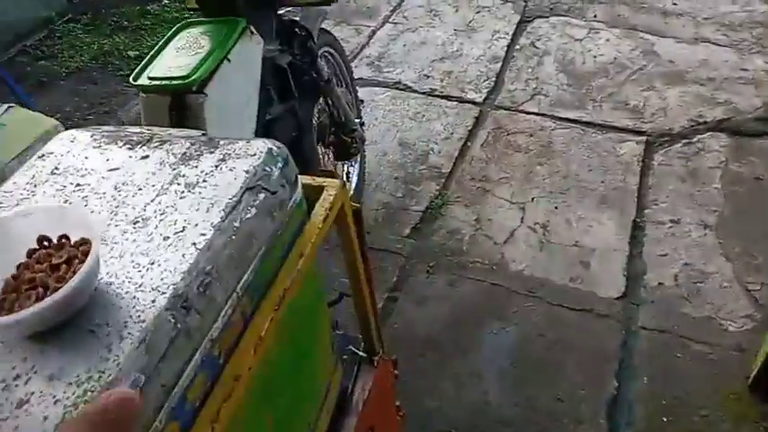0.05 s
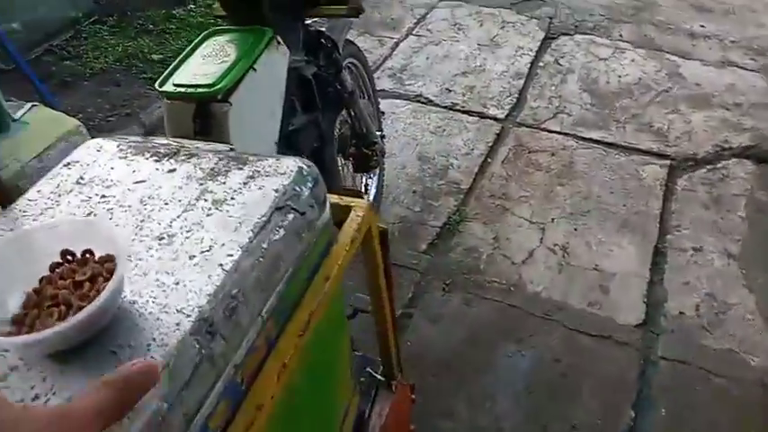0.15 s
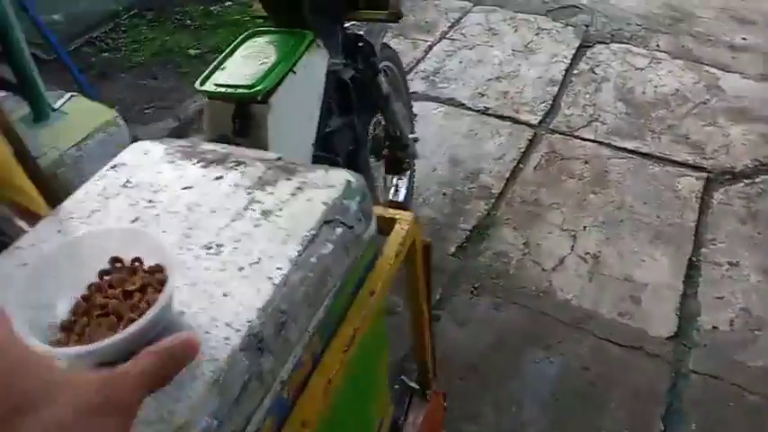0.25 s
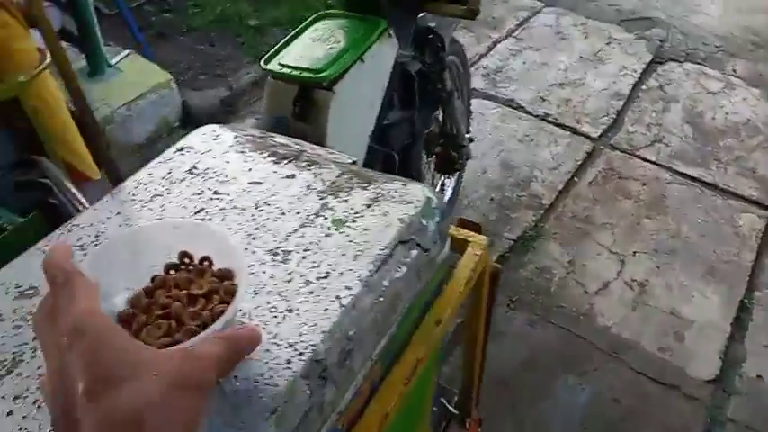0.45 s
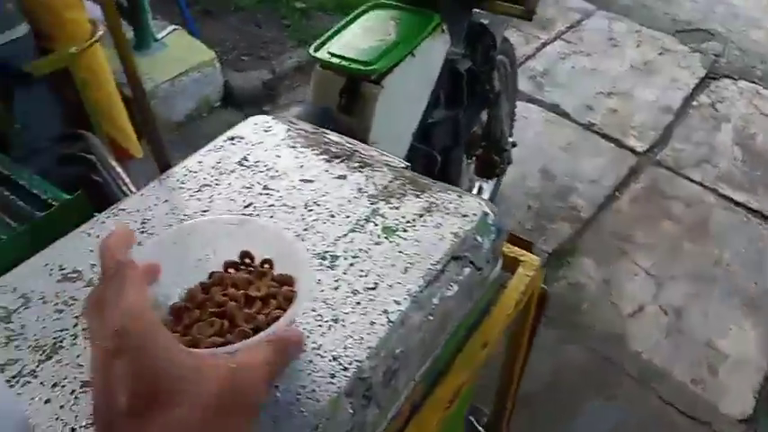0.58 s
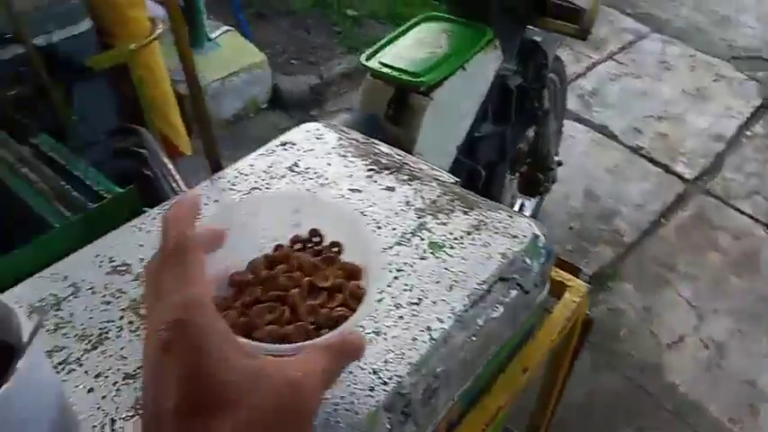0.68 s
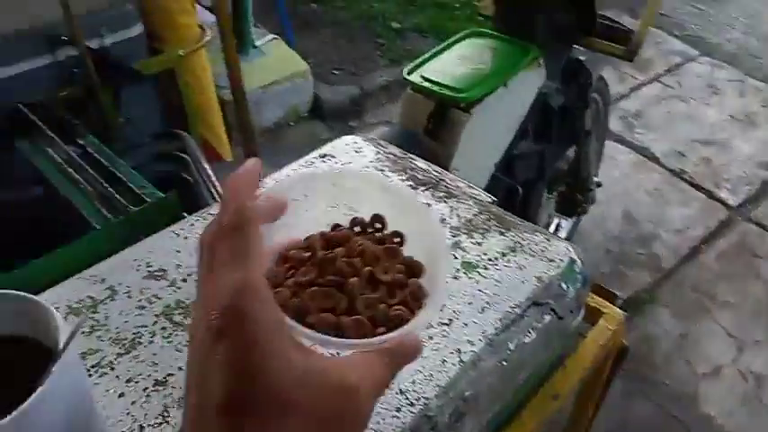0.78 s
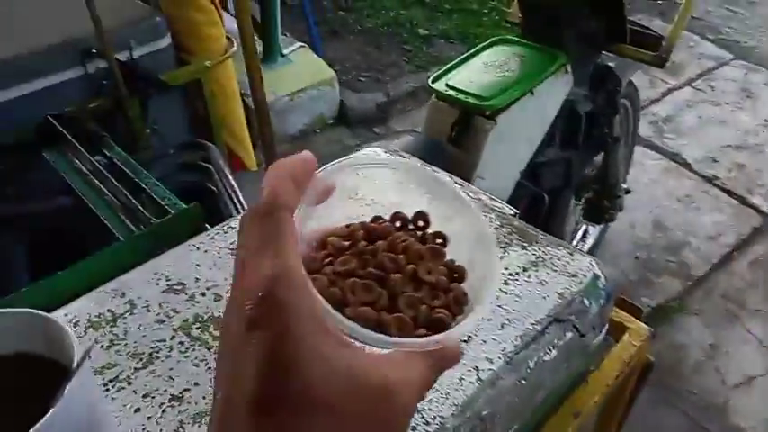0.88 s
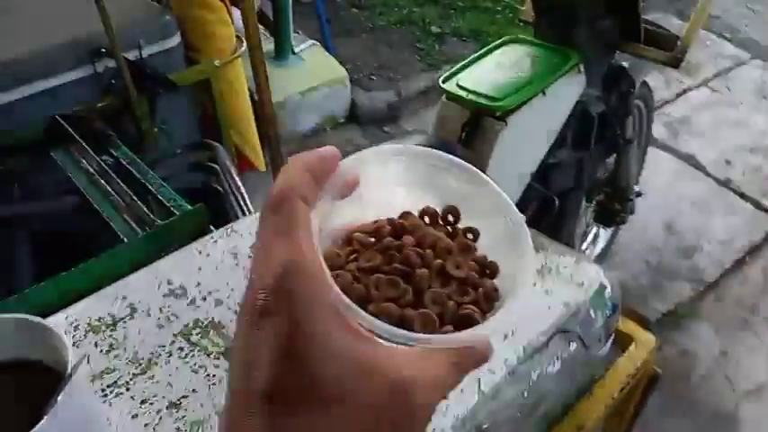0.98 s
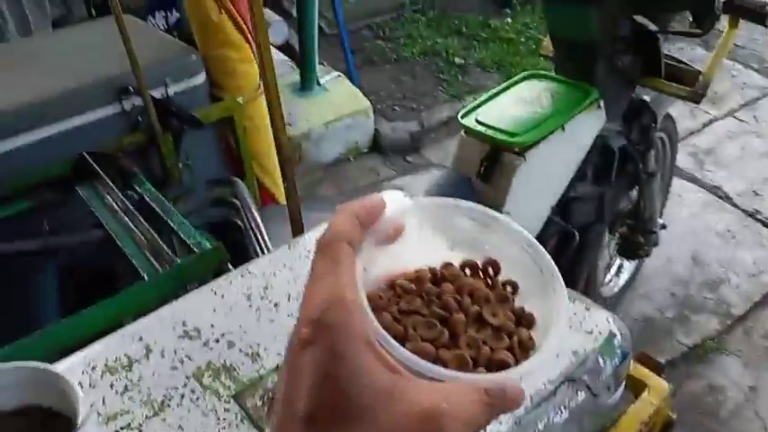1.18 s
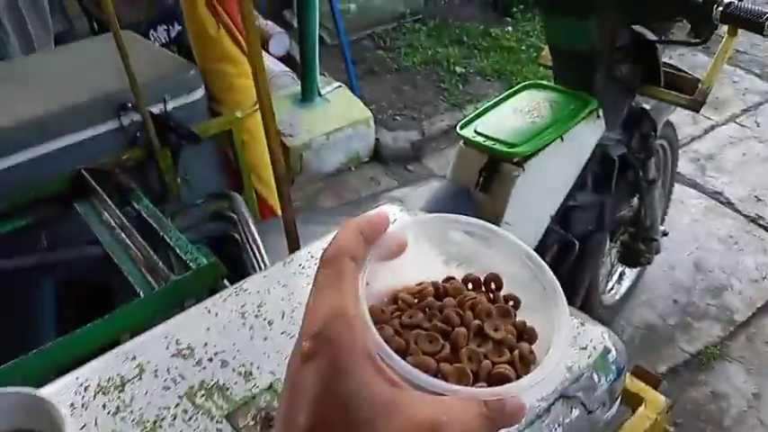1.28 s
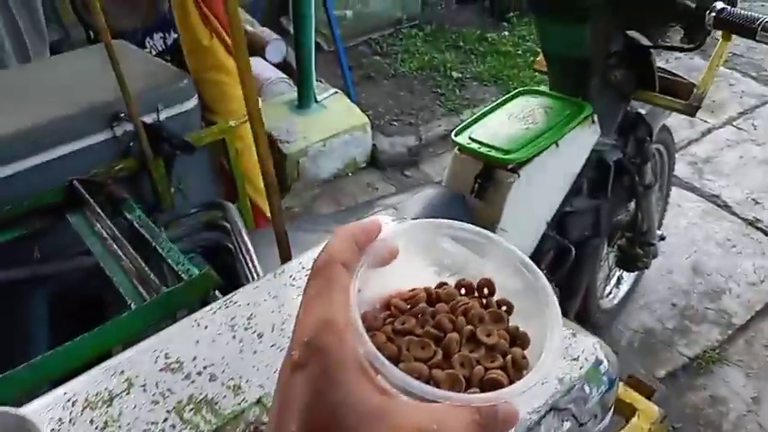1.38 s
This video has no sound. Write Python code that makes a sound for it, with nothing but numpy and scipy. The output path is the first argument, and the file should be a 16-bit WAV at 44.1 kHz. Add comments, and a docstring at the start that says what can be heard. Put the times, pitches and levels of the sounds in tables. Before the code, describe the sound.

Dry pellets clatter in a plastic cup lifted from a metal lid, engine idling faintly behind

```python
"""Cup of dry pet food, walled yard

A plastic cup is gripped, dragged off a metal lid and lifted: damped rings knock, stick-slip impacts
judder through resonances of cup and lid, and coloured random clicks make the pellets rattle.
Small birds chirp as gliding tones between the walls; an engine idles some way off as orders over rumble.
All but the engine is weaker at the right microphone below about 9.5 kHz; the engine is weaker there too."""
import sys
import numpy as np
from scipy import signal
from scipy.fft import rfft, irfft, next_fast_len
from scipy.io import wavfile
from scipy.ndimage import map_coordinates

SR = 44100
rng = np.random.default_rng(int(sys.argv[2]) if len(sys.argv) > 2 else 0)


def unload_audio(sound):
    """Save the sound as a 16-bit wav file, at the path given as the first command line argument."""
    columns = np.transpose(np.atleast_2d(sound))
    # keep every value between -1 and 1, then stretch to whole-number steps
    steps = np.round(np.clip(columns, -1, 1) * 32767)
    wavfile.write(sys.argv[1], SR, steps.astype(np.int16))


N = 63945
TIME_S = np.arange(N) / SR

# Levels are those of each source before the yard and the microphones; spectra are relative.
# outdoor hiss spectrum [freq_hz, level_db]
AIR_SPECTRUM = [(300, -12), (550, -8.5), (900, -5.5), (1100, 3.5), (1400, -7), (2200, 2.5), (3000, -2),
                (4200, 1), (5300, -1), (6700, 5), (7600, -1.5), (8800, -22), (11000, -19.5), (13000, -43),
                (15500, -27)]
# outdoor hiss over time [time_s, level_db]
AIR_LEVEL = [(0, -42.5), (.15, -46.5), (.35, -43), (.48, -46.5), (.85, -45), (1.0, -48), (1.2, -46),
             (1.45, -47.5)]
# exhaust rumble spectrum [freq_hz, level_db]
RUMBLE_SPECTRUM = [(20, -37), (42, -34), (62, -13), (130, 4), (220, -0.5), (330, -7.5), (450, -16.5),
                   (800, -34), (2000, -50)]
# rise and fall of the rumble [time_s, gain_db]
RUMBLE_GAIN = [(0, 0.5), (.25, 8), (.45, -0.5), (.65, 3.5), (.9, 2), (1.25, 1.5), (1.45, -11)]
# idling engine [time_s, firings_per_s]
IDLE_RATE = [(0, 30.2), (.2, 31.6), (.4, 30.9), (.8, 30.6), (1.0, 30.2), (1.15, 30.3), (1.45, 28.4)]
# strong engine orders, before ORDERS_DB [time_s, order4_db, order5_db, order6_db, order8_db]
STRONG_ORDERS = [(0, -57, -44, -58, -60), (.14, -51, -43, -53, -55), (.29, -54, -42, -39.5, -50),
                 (.43, -54, -52, -44.5, -48), (.62, -49, -50, -47, -54), (.85, -52, -50, -43, -48),
                 (.96, -49, -54, -46, -50), (1.07, -55, -45, -54, -58), (1.3, -58, -47, -47, -60),
                 (1.45, -60, -50, -52, -64)]
# weak engine orders, before ORDERS_DB [multiple of firing rate, level_db]
WEAK_ORDERS = [(2, -71), (3, -66), (7, -66), (9, -66), (10, -64), (12, -70)]
# bird chirps [start_s, length_s, start_hz, end_hz, level_db, roughness as share of pitch]
CHIRPS = [(-.025, 0.08, 4992, 4940, -43.5, .001), (0.23, 0.017, 5660, 6080, -31, .035),
          (0.235, 0.031, 4020, 3722, -33, 0.076), (0.693, .028, 6700, 5726, -33, .06),
          (0.705, 0.068, 4447, 4247, -32, 0.1), (0.741, 0.031, 6270, 5920, -36.5, 0.15),
          (.745, .04, 3600, 2870, -40, 0.148), (0.828, 0.058, 6480, 6310, -33.5, .11),
          (0.941, .13, 3253, 5260, -48.5, 0.036), (1.413, .06, 4230, 5120, -49, 0.042)]
# colour of the pellet clicks [freq_hz, level_db]
PELLET_SPECTRUM = [(60, -46), (300, -12), (800, -13), (2300, 4.5), (4000, 0.5), (4900, -0.5), (6500, 5.5),
                   (7600, 1.5), (8800, -11.5), (11000, -12.5), (13500, -39), (15300, -10)]
# pellets sliding in the cup [time_s, level_db]
SLIDE = [(.514, -46), (.521, -32), (.545, -27), (.572, -21.5), (.592, -29.5), (.615, -36.5), (.645, -55),
         (.68, -37.5)]
# light shifts under the fingers [peak_s, rise_s, fall_t60_s, level_db, centre_hz, width_octaves]
SHIFTS = [(.01, 0.062, 0.79, -43, 1430, 0.66), (0.249, 0.012, 0.071, -40.5, 1710, 0.33),
          (.298, 0.017, 0.094, -44, 5100, 1), (0.309, 0.012, 0.077, -40, 1220, .8),
          (1.168, 0.011, .2, -42.5, 1940, .45), (1.257, 0.02, 0.14, -43.5, 1780, 0.62),
          (1.261, 0.039, .12, -44.5, 320, 0.58)]
# drag of the cup over the lid [time_s, level_db]
DRAG = [(.514, -34), (.519, -26.5), (.538, -26), (.548, -20.5), (.573, -30), (.585, -32), (.61, -45.5),
        (.66, -63)]
# resonances of cup and lid [freq_hz, width_hz, peak_db]
BODY_MODES = [(874, 25, -5), (942, 40, 0), (1084, 28, -2), (1131, 28, -1), (1490, 40, -8), (1590, 28, -2),
              (1672, 28, -2), (2260, 55, -4), (2480, 40, -8), (2600, 40, -8), (3014, 30, -4),
              (3167, 30, -4), (3312, 30, -6), (3731, 28, 1), (3952, 35, -6), (4285, 55, -6)]
# knocks of cup and hand on the lid [start_s, level_db, centre_hz, width_octaves, t60_s]
KNOCKS = [(0.502, -28.5, 1950, 0.36, 0.022), (0.5148, -24.5, 1940, 1.1, .025),
          (0.5196, -14.5, 3040, 0.17, 0.012), (0.5192, -22.5, 1390, 0.5, .014),
          (0.5283, -25.5, 1650, 0.14, 0.06), (.531, -18.5, 1650, .25, 0.0083),
          (0.5459, -17.5, 1120, 0.25, .02), (0.5525, -26, 5800, 0.37, 0.0087),
          (.559, -20.5, 960, 0.22, 0.027), (0.5648, -23, 1120, 0.67, 0.029),
          (0.5713, -23, 930, 0.12, 0.027), (0.5721, -13, 4000, 0.69, 0.015),
          (0.062, -33, 4830, 0.47, 0.027), (.304, -27.5, 1300, 0.91, 0.021),
          (.303, -26.5, 8450, 2.3, 0.0066), (.312, -32.5, 696, 0.86, 0.028), (.319, -37, 3000, 1.7, 0.012),
          (.324, -31, 6400, 0.15, 0.011), (1.151, -36.5, 6900, 0.75, .014), (1.234, -34.5, 6700, .7, 0.03),
          (1.248, -32.5, 2940, 1.3, 0.03), (1.293, -43, 1200, 0.27, 0.024), (0.22, -40.5, 89, 0.042, 0.11)]
# decay between the yard walls [freq_hz, t60_s]
YARD_DECAY = [(200, 0.7), (1000, 0.31), (4000, 0.33), (7000, 0.31), (14000, 0.18)]
# right microphone response, for all but the engine [freq_hz, gain_db]
RIGHT_RESPONSE = [(60, -36), (300, -4), (700, -5), (1300, -8), (2400, -14), (4400, -8.5), (7000, -20.5),
                  (10000, 2.5), (15000, 4)]

LEFT_LAG_S = 0.001212  # direct sound reaches the left microphone this much later
TOP_HZ = 15850  # band limit
KNOCK_RISE_S = 0.00098
WHINE_HZ, WHINE_DB = 1111, -61  # a faint narrow hum in the background
ORDERS_DB = -1.5  # gain of all engine orders
RUMBLE_DB, RUMBLE_APART_DB = -52.5, -55  # common to both microphones, different at each; before RUMBLE_GAIN


def amp(db):
    """Decibels to gain."""
    return 10 ** (np.asarray(db) / 20)


def unit(x):
    """Scale to rms 1."""
    return x / np.sqrt(np.mean(x ** 2) + 1e-20)


def along(points, hz):
    """Interpolate (Hz, value) points on a log frequency axis."""
    point_hz, values = np.transpose(points)
    return np.interp(np.log(hz + 1), np.log(point_hz + 1), values)


def curves(rows):
    """One value per sample for each column after the time."""
    times, *columns = np.transpose(rows)
    return [np.interp(TIME_S, times, column) for column in columns]


def stroke(rows):
    """Gain along a (s, dB) curve, silent before and after it."""
    inside = (TIME_S >= rows[0][0]) & (TIME_S <= rows[-1][0])
    return inside * amp(curves(rows)[0])


def wobble(rate):
    """A smooth random curve, rate knots a second."""
    return map_coordinates(rng.standard_normal(N), [TIME_S * rate], mode="mirror")


def filtered(x, response):
    """x times a complex response of frequency, padded so that tails do not wrap."""
    size = next_fast_len(N + SR // 2)
    hz = np.fft.rfftfreq(size, 1 / SR)
    return irfft(rfft(x, size) * response(hz), size)[..., :N]


def coloured(x, spectrum):
    """x shaped by the given spectrum, at rms 1."""
    return unit(filtered(x, lambda f: amp(along(spectrum, f))))


def band(x, hz, octaves):
    """A bell-shaped band on a log frequency axis, rolled off above 8200 Hz."""
    def response(f):
        bell = np.exp(-.5 * (np.log2((f + 1) / hz) / octaves) ** 2)
        return bell / np.sqrt(1 + (f / 8200) ** 8)
    return filtered(x, response)


def contacts(rate, spread_db):
    """Tiny impacts at random times (rate a second), of random size and sign."""
    hits = rng.random(N) < rate / SR
    size = amp(spread_db * np.clip(rng.standard_normal(N), -2, 2))
    return hits * size * np.sign(rng.standard_normal(N))


def yard(x, wet_db):
    """Direct sound plus the walls' answer, noise dying at its own rate in each band; power about kept."""
    hz, t, noise = signal.stft(rng.standard_normal((2, SR // 2)), SR, nperseg=256)
    decay = amp(-60 * t / along(YARD_DECAY, hz)[:, None])
    build_up = 1 - np.exp(-t / 0.0017)
    tail = signal.istft(noise * decay * build_up, SR, nperseg=256)[1]
    wet = signal.fftconvolve(x[None], tail / np.linalg.norm(tail[0]), axes=1)[:, :N]
    # the right microphone gets the direct sound early, so the left one lags
    right = filtered(x, lambda f: np.exp(2j * np.pi * f * LEFT_LAG_S))
    direct = np.array([x, right])
    return (direct + amp(wet_db) * wet) / np.hypot(1, amp(wet_db))


def air():
    """Outdoor hiss, mostly different at each microphone, and a faint hum of very narrow noise."""
    noise = rng.standard_normal((2, N)) + 0.21 * rng.standard_normal(N)
    level_db = curves(AIR_LEVEL)[0] + 0.17 * wobble(rate=75)
    hiss = coloured(noise, AIR_SPECTRUM) * amp(level_db)
    whine = unit(band(rng.standard_normal((2, N)), WHINE_HZ, 0.015))
    return hiss + amp(WHINE_DB) * whine


def engine():
    """Low multiples of the drifting firing rate, wavering in level, over an exhaust rumble of noise."""
    phase = 2 * np.pi * np.cumsum(curves(IDLE_RATE)[0]) / SR
    strong = zip((4, 5, 6, 8), curves(STRONG_ORDERS))
    orders = np.zeros(N)
    for k, db in [*strong, *WEAK_ORDERS]:
        level = amp(db + 1.2 * wobble(rate=12.32))
        orders += level * np.sqrt(2) * np.cos(k * phase + 2 * np.pi * rng.random())
    common = coloured(rng.standard_normal(N), RUMBLE_SPECTRUM)
    apart = coloured(rng.standard_normal((2, N)), RUMBLE_SPECTRUM)
    rumble = amp(RUMBLE_DB) * common + amp(RUMBLE_APART_DB) * apart
    return amp(ORDERS_DB) * orders + rumble * amp(curves(RUMBLE_GAIN)[0])


def birds():
    """Gliding whistles, most of them hoarse from fast random pitch changes."""
    out = np.zeros(N)
    for start, length, start_hz, end_hz, db, rough in CHIRPS:
        progress = np.clip((TIME_S - start) / length, 0, 1)
        glide_hz = start_hz + (end_hz - start_hz) * progress
        hz = glide_hz * (1 + rough * wobble(rate=1300))
        swell = np.sqrt(2 * np.abs(np.sin(np.pi * progress)))
        out += amp(db) * swell * np.sin(2 * np.pi * np.cumsum(hz) / SR)
    return out


def pellets():
    """Pellets click against each other: one big slide and several light shifts."""
    out = coloured(contacts(rate=2700, spread_db=4.5), PELLET_SPECTRUM) * stroke(SLIDE)
    for peak, rise, t60, db, hz, octaves in SHIFTS:
        t = TIME_S - peak
        shape = np.exp(-(np.minimum(t, 0) / rise) ** 2) * amp(-60 * np.maximum(t, 0) / t60)
        clicks = contacts(rate=1100, spread_db=3.0)
        ringing = unit(band(clicks, hz, octaves))
        out += amp(db) * shape * (ringing + amp(-3.5) * coloured(clicks, PELLET_SPECTRUM))
    return out


def drag():
    """The base sticks and slips: tiny impacts ring the resonances of cup and lid."""
    slips = unit(contacts(rate=2500, spread_db=3)) * stroke(DRAG)

    def body(f):
        total = 0
        for k, (hz, width, db) in enumerate(BODY_MODES):
            mode = 1j * f * width / (hz * hz - f * f + 1j * f * width)
            total = total + (-1) ** k * amp(db) * mode  # neighbours in opposite phase
        return total

    return unit(filtered(slips, body)) * slips.std()


def knocks():
    """Each knock is a short, unsteady, heavily damped ring of the plastic."""
    out = np.zeros(N)
    for start, db, hz, octaves, t60 in KNOCKS:
        t = np.maximum(TIME_S - start, 0)
        shape = (1 - np.exp(-(t / KNOCK_RISE_S) ** 2)) * amp(-60 * t / t60)
        noise = band(rng.standard_normal(N), hz, octaves)
        analytic = signal.hilbert(noise, next_fast_len(N))[:N]
        ring = np.cos(np.angle(analytic))  # steady strength, wandering pitch
        out += amp(db) * unit(ring) * shape / shape.max()
    return filtered(out, lambda f: 1 / np.sqrt(1 + (f / 8500) ** 8))


def scene():
    """Cup and birds in the yard with the air, right microphone shaded, and the engine 3.7 dB down there."""
    mix = air() + yard(birds(), wet_db=-1.5)
    mix += yard(pellets(), wet_db=0.5) + yard(drag(), wet_db=-9.5) + yard(knocks(), wet_db=-5.5)
    right = filtered(mix[1], lambda f: amp(along(RIGHT_RESPONSE, f)))
    return np.array([mix[0], right]) + engine() * amp([[0], [-3.7]])


def record(dry):
    """Nothing is kept above the band limit."""
    return filtered(dry, lambda hz: hz < TOP_HZ)


dry = scene()
out = record(dry)
unload_audio(out)
```